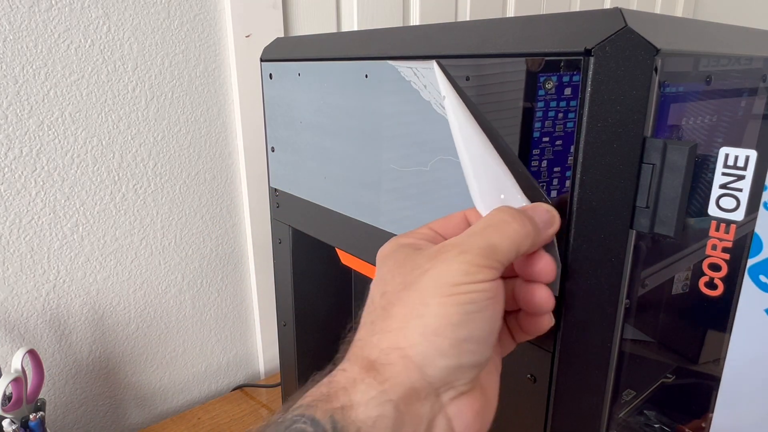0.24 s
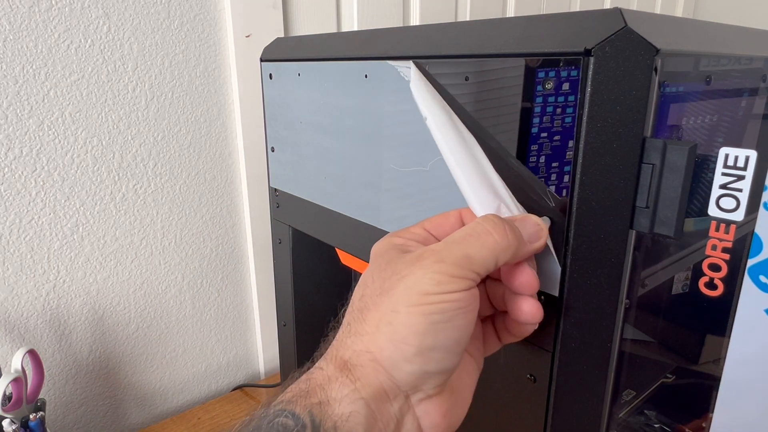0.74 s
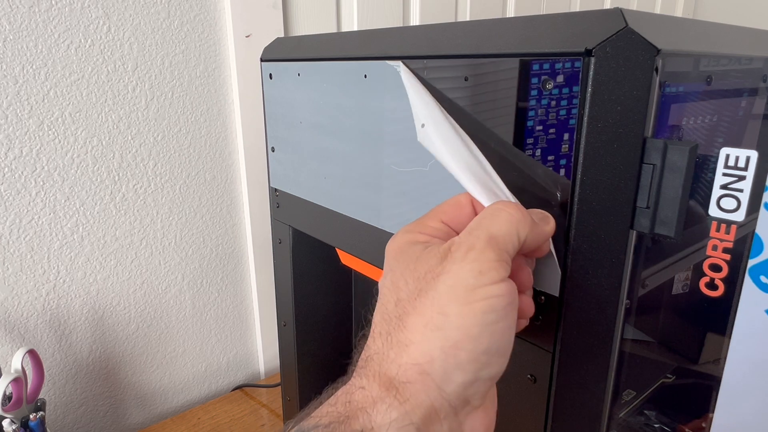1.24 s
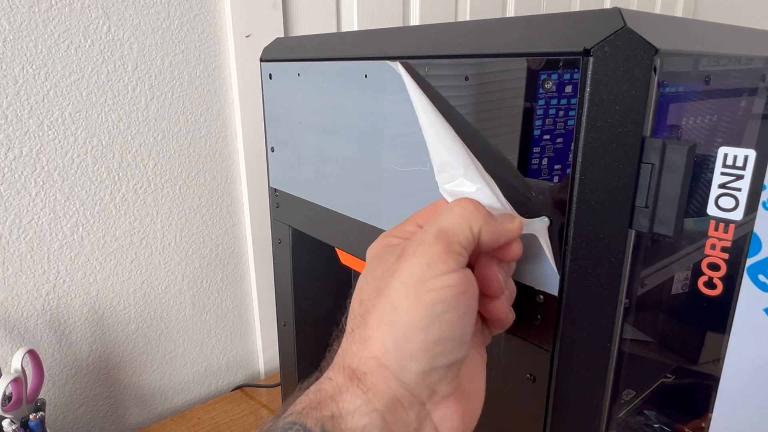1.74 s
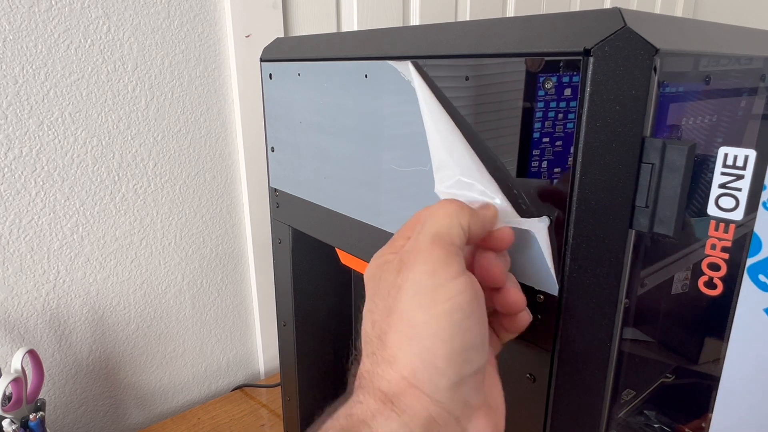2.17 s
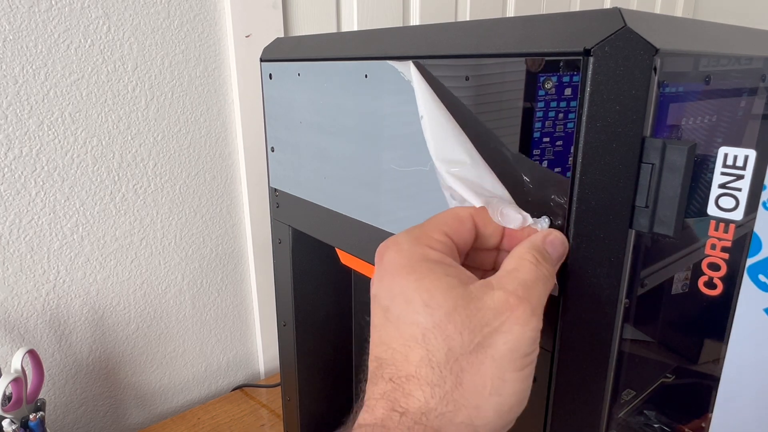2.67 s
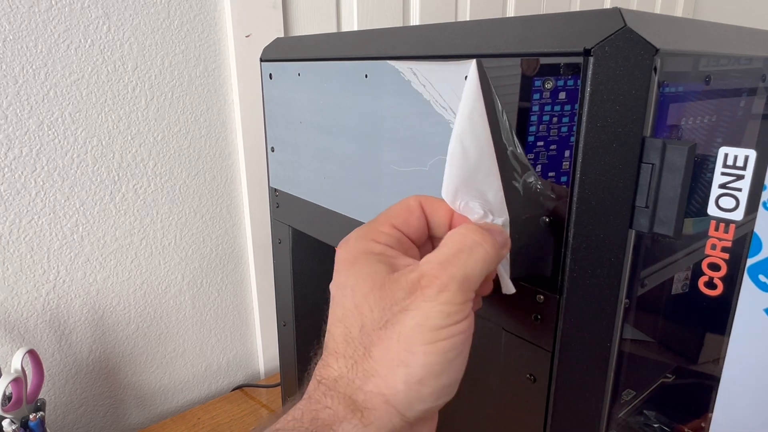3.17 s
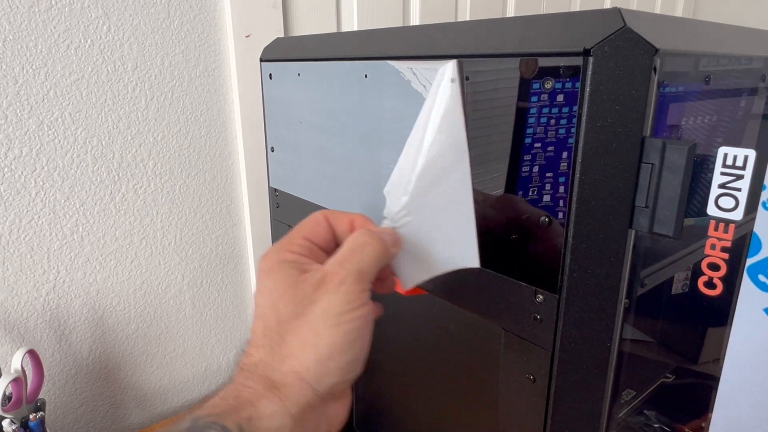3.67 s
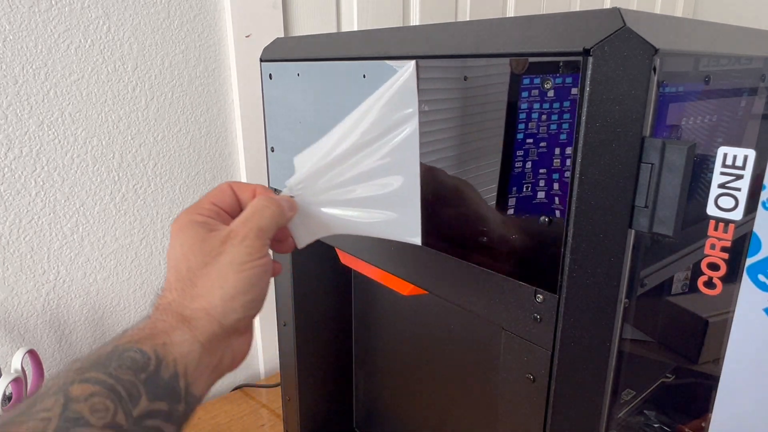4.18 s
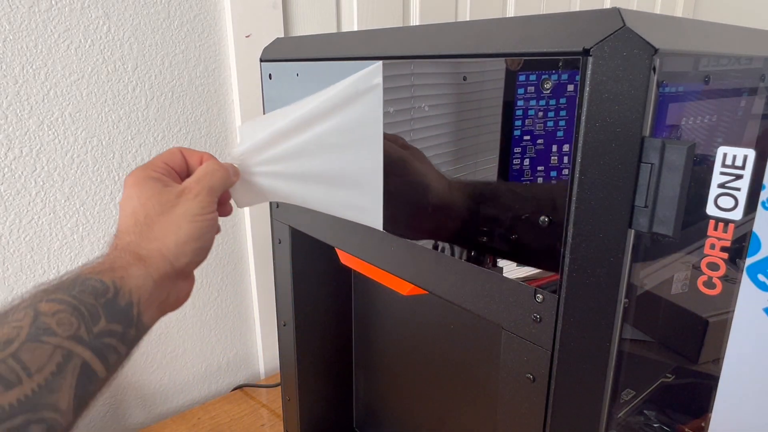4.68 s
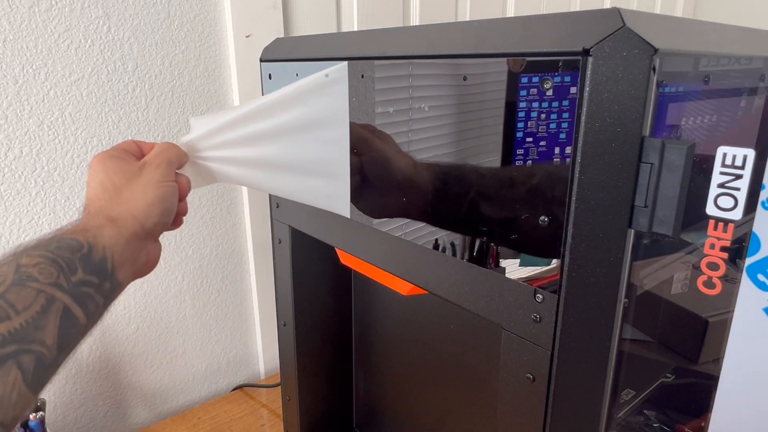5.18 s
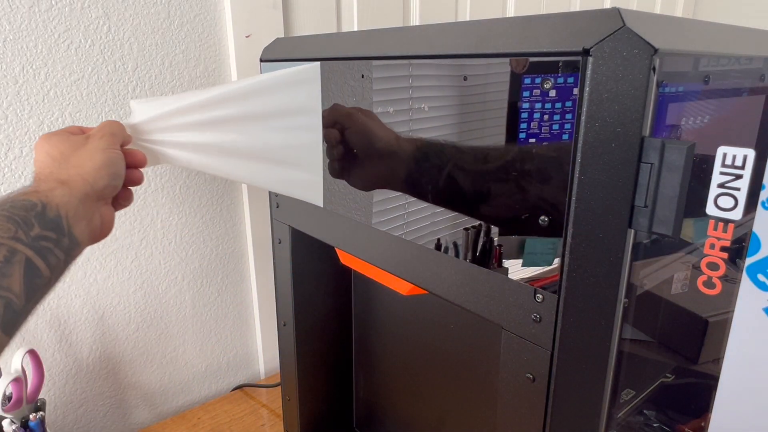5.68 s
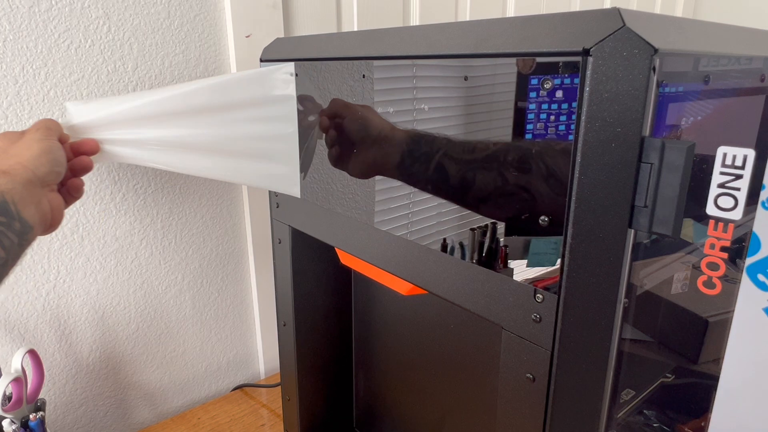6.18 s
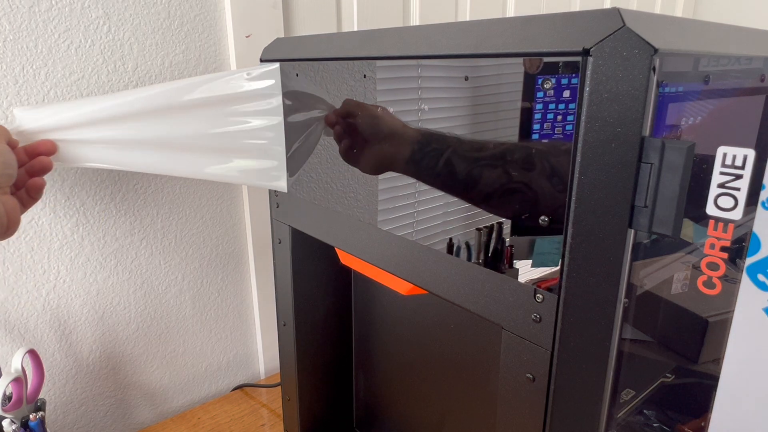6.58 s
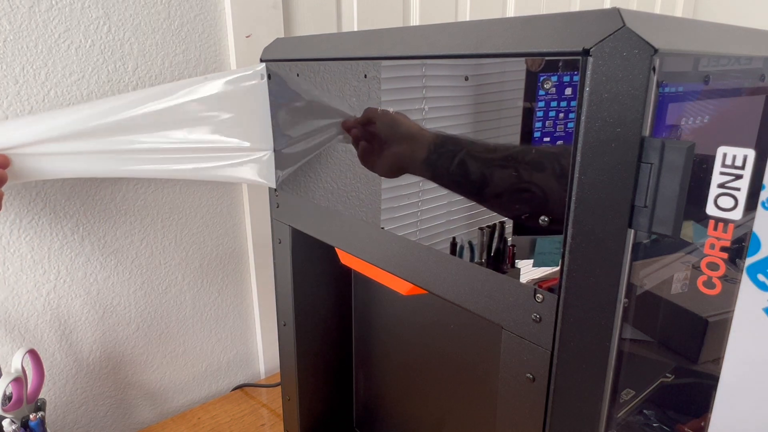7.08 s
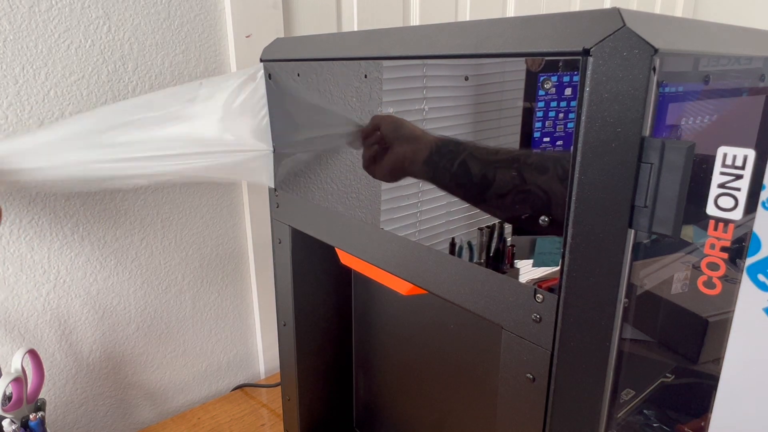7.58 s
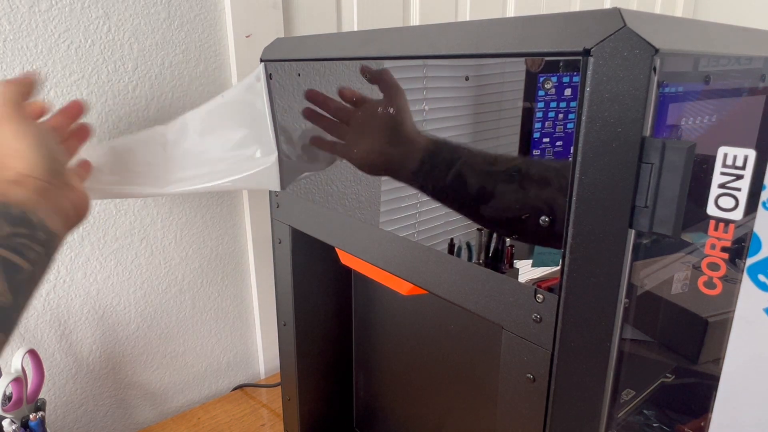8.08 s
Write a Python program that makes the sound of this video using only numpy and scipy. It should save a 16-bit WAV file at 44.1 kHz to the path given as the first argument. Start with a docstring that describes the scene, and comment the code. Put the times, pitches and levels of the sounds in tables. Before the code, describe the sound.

Close, in a small room with a faint low hum, fingers crinkle loose plastic film with dry snaps and quiet gaps. A loud hollow pop and brief high squeak come near three seconds. The film then peels in rapid jerky rips that blend into a thinning fine sizzle, until it releases with a crack and dull panel knock, then flaps and rustles.

```python
"""Protective film is pulled by hand off the front panel of a machine in a small room, over a low mains hum.
The slack film crinkles and snaps as its corner is worked loose (noise bursts), and folds pop (decaying modes).
Fingers tug the panel and squeak on the film (resonant noise), which then peels in slips that merge into
a fine sizzle (dense random clicks). At last the film lets go with a crack that sets the panel ringing,
and it flaps and rustles slack."""
import sys
import numpy as np
from scipy import signal
from scipy.fft import rfft, irfft
from scipy.io import wavfile
from scipy.ndimage import uniform_filter1d, map_coordinates

SR = 44100
rng = np.random.default_rng(int(sys.argv[2]) if len(sys.argv) > 2 else 0)


def master(y):
    """Save y as 16-bit WAV."""
    cut = np.clip(np.atleast_2d(y).T, -1, 1)
    pcm = np.round(cut * 32767)  # scale
    wavfile.write(sys.argv[1], SR, pcm.astype(np.int16))


N = 367353
TIME = np.arange(N) / SR


def from_db(db):
    """Level to amplitude: 20 dB is a factor of ten."""
    return 10 ** (np.asarray(db) / 20)


def rms_one(x):
    """Power normalisation: unit rms."""
    return x / np.sqrt(np.mean(x ** 2) + 1e-20)


def peak_one(x):
    """Short-time power normalisation: the loudest 4 ms get unit rms."""
    return x / np.sqrt(uniform_filter1d(np.mean(x ** 2, axis=0), size=176).max())


def in_time(rows):
    """Linear interpolation: each column of a curve at every sample."""
    s, *columns = np.transpose(rows)
    return [np.interp(TIME, s, column) for column in columns]


def between(start_s, end_s):
    """Gating: one between two times, with soft ends."""
    inside = (TIME >= start_s) & (TIME <= end_s)
    return uniform_filter1d(1. * inside, size=900)


def during(rows):
    """Gating: one while a curve lasts."""
    return between(rows[0][0], rows[-1][0])


def at_hz(points, hz):
    """Interpolation on a logarithmic frequency axis."""
    f, value = np.transpose(points)
    return np.interp(np.log(np.maximum(hz, 1)), np.log(f), value)


def band(x, low_hz, high_hz):
    """Band limitation by a causal Butterworth filter."""
    edges = [low_hz, min(high_hz, .45 * SR)]
    return signal.sosfilt(signal.butter(2, edges, "band", fs=SR, output="sos"), x)


def coloured(x, spectrum, size=4096):
    """Minimum-phase filtering: the spectrum's cepstrum, made causal, gives a response of unit energy."""
    cepstrum = irfft(np.log(from_db(at_hz(spectrum, np.fft.rfftfreq(size, 1 / SR)))))
    response = irfft(np.exp(rfft(2 * cepstrum[:size // 2], size)))
    response = response / np.linalg.norm(response)
    return signal.oaconvolve(x, response[None], axes=-1)[:, :x.shape[-1]]


def varied(colour, count=22):
    """Individual resonance: each patch of film gets chance peaks and valleys, with a spread of 3 dB."""
    hz = np.geomspace(colour[0][0], colour[-1][0], count)
    return list(zip(hz, at_hz(colour, hz) + 3 * rng.standard_normal(count)))


def drift(rate):
    """Random fluctuation: chance values, rate per second, joined by lines; rms 1."""
    knots = rng.standard_normal(int(TIME[-1] * rate) + 2)
    return rms_one(np.interp(TIME * rate, np.arange(len(knots)), knots))


def pair(alike, size=N):
    """Interchannel coherence: left and right white noise with a given correlation."""
    mid, side = rng.standard_normal((2, size))
    alike = np.clip(alike, 0, 1)
    return (np.sqrt(1 + alike) * mid + np.sqrt(1 - alike) * side * [[1], [-1]]) / np.sqrt(2)


def grains(per_s, spread_db, clump_db, alike):
    """Impulsive noise: random clicks of uneven size whose strength swells in clumps; rms 1."""
    sizes_db = spread_db * np.minimum(rng.exponential(1, N), 5.5)
    sizes = from_db(sizes_db + clump_db * drift(180))
    return rms_one(pair(alike) * sizes * (rng.random(N) < per_s / SR))


def narrow_noise(hz, width_hz):
    """Quadrature modulation: noise in one moving resonance; rms 1."""
    phase = 2 * np.pi * np.cumsum(hz) / SR
    return rms_one(drift(width_hz) * np.cos(phase) + drift(width_hz) * np.sin(phase))


def struck(s, modes):
    """Modal superposition: decaying modes, set off together with alternating signs."""
    t = np.maximum(TIME - s, 0)
    ring = np.zeros(N)
    for k, (hz, db, t60) in enumerate(modes):
        decay = from_db(np.maximum(db - 60 * t / t60, -200))
        ring += (-1) ** k * decay * np.sin(2 * np.pi * hz * t)
    return ring


def avalanche(envelope, alike):
    """Shot noise with a flat spectrum: tiny ruptures under an envelope."""
    swell, size = np.sqrt(envelope), len(envelope)
    ruptures = pair(alike, size=size) * from_db(4.6 * np.minimum(rng.standard_normal(size), 2))
    whitened = irfft(np.exp(1j * np.angle(rfft(ruptures * swell))))
    return swell * whitened


def burst(t60, rise_s, alike, spike_db=-12, size=4096):
    """Brittle fracture: one sharp step amid an avalanche that rises and decays exponentially."""
    t = TIME[:size]
    envelope = (1 - np.exp(-t / rise_s)) * from_db(-60 * t / max(t60, .002))
    fracture = np.diff(signal.unit_impulse(size, np.argmax(envelope) // 2), prepend=0)
    return avalanche(envelope, alike) + from_db(spike_db) * fracture


def add(out, s, sound):
    """Superposition: mix a sound in at a time."""
    i = max(round(s * SR), 0)
    out[:, i:i + sound.shape[-1]] += sound[:, :max(N - i, 0)]


# mains hum and the tones of a fan: (frequency [Hz], level [dB], wavering [dB])
HUM_TONES = [(59.97, -57.5, 1.4), (56.2, -69.5, 0.5), (118, -73, 4), (151, -78, 3.5)]
# soft rush of air: (frequency [Hz], relative density [dB])
AIR_COLOUR = [(25, -0.5), (55, 5), (100, 4.5), (200, -11), (450, -24.5), (1100, -38.5), (1700, -11),
              (2500, -40.5), (3400, -26.5), (4300, -43), (6000, -24.5), (9000, -39.5), (15000, -41.5)]


def background():
    """Beating of neighbouring tones: mains hum with an idling fan, over its soft rush."""
    hum = np.zeros(N)
    for hz, db, waver_db in HUM_TONES:
        hum += from_db(db + waver_db * drift(6.3)) * np.sqrt(2) * np.sin(2 * np.pi * hz * TIME)
    return hum + from_db(-62.5) * coloured(pair(0.79), AIR_COLOUR)


def grip(s, length_s):
    """Exponential envelope: attack, hold and release of one movement of the fingers."""
    attack_s, release_s = 0.018, 0.048
    outside = np.maximum((s - TIME) / attack_s, (TIME - s - length_s) / release_s)
    return np.exp(-np.clip(outside, 0, 20))


PEEL_START_S, PEEL_END_S = 3.48, 7.2
# fingers take a new hold of the loose film:
# (time [s], length [s], crinkle level [dB], rubbing level [dB])
GRIPS = [(0, 0.083, -63.5, -76), (0.273, 0.13, -54, -62), (0.665, 0.12, -63.5, -65.5),
         (0.966, 0.39, -59, -61), (1.633, 0.46, -77, -59), (2.167, 0.036, -48.5, -51.5),
         (2.805, 0.02, -50.5, -63.5), (2.934, 0.19, -59, -54), (3.191, 0.38, -70.5, -63),
         (7.546, 0.37, -49.5, -55), (8.046, 0.23, -48, -57)]
# skin on film: (frequency [Hz], relative density [dB])
RUBBING_COLOUR = [(100, -2), (240, 4.5), (300, 0.5), (600, -5), (1150, -8.5), (1600, -1.5), (2600, -11),
                  (6000, -19)]
# flipping creases and bright ticks: (frequency [Hz], relative density [dB])
TICK_COLOUR = [(400, -22), (1200, -8.5), (2500, -5), (6000, -8), (9000, -1), (15000, -7.5)]


def handling():
    """Buckling and friction: the slack film crinkles, and skin rubbing on it stirs the panel's main mode."""
    flips = grains(per_s=900, spread_db=2, clump_db=4, alike=.3)
    crinkle = coloured(flips, [(800, -9.5), (2500, -6.0), (5500, -6), (9000, -2.5), (15000, -11.5)])
    stray_creases = grains(per_s=17, spread_db=8.5, clump_db=2.0, alike=0.22)
    crinkle = crinkle + from_db(-11) * coloured(stray_creases, TICK_COLOUR)
    rubbing = coloured(grains(per_s=6500, spread_db=3.0, clump_db=2.0, alike=0.55), RUBBING_COLOUR)
    panel = narrow_noise(np.full(N, 250), width_hz=14)
    # between grips the slack film is just held
    slack = 1 - between(PEEL_START_S, PEEL_END_S)
    crinkle_gain, rubbing_gain = slack * from_db(-74), slack * from_db(-72.5)
    for s, length_s, crinkle_db, rubbing_db in GRIPS:
        press = grip(s, length_s)
        crinkle_gain = np.maximum(crinkle_gain, from_db(crinkle_db) * press)
        rubbing_gain = np.maximum(rubbing_gain, from_db(rubbing_db) * press)
    return crinkle_gain * crinkle + rubbing_gain * (rms_one(rubbing) + from_db(-7) * panel)


def clicks(events, colour, t60):
    """Impulsive excitation: one short burst for each row, each with a colour of its own."""
    out = np.zeros((2, N))
    for s, db in events:
        click = coloured(burst(t60, rise_s=0.00053, alike=0.37), varied(colour))
        add(out, s, from_db(db) * peak_one(click))
    return out


# a small crease flips: (time [s], level [dB])
TICKS = [(0.2665, -34), (0.29, -26.5), (0.308, -26.5), (0.315, -32), (1.2255, -32), (1.3145, -30),
         (1.843, -41), (2.676, -48.5), (3.407, -44), (4.2545, -40), (4.3217, -41), (4.4044, -46),
         (4.597, -43), (4.7786, -45.5), (4.9258, -37), (5.9363, -41.5), (6.164, -38), (7.901, -38.5),
         (8.0699, -37), (8.103, -31), (8.231, -37.5)]


def ticks():
    """Snap-through: each small crease releases its strain in one click."""
    return clicks(TICKS, TICK_COLOUR, t60=0.026)


# a wide patch of film: (frequency [Hz], relative density [dB])
THUD_COLOUR = [(40, -21.0), (230, 2), (450, 4), (660, -5), (1100, 1), (2500, -25.5)]


def thud():
    """Radiation from a large area: the low knock of a wide patch of film jumping."""
    return peak_one(coloured(burst(t60=.035, rise_s=0.00088, alike=0.8), THUD_COLOUR))


# the film buckles or a patch of glue lets go:
# (time [s], treble level [dB], body: bass minus treble [dB], length [s])
SNAPS = [(0.2754, -30, -19, 0.0014), (0.3412, -17.5, -18, 0.0018), (1.048, -38, -15, 0.0033),
         (1.104, -29, -28.5, 0.0021), (1.183, -18.5, -15, 0.0002), (1.2593, -21, -11, 0.0044),
         (1.273, -26, -11.5, 0.0037), (1.972, -22.5, -57, 0.0017), (2.9876, -20, -10, 0.0041),
         (3.258, -40, -11.5, 0.0034), (4.9633, -27.5, -23.5, 0.0036), (6.921, -23, -25.5, 0.00182),
         (7.572, -22, 3, 0.00427), (7.576, -25, -4, 0.0092), (7.5941, -26, -3.5, 0.0062),
         (7.762, -32, -13, 0.0059), (7.823, -31, -35, 0.0019)]
# treble of a snap: (frequency [Hz], relative density [dB])
SNAP_COLOUR = [(1500, -29), (3100, -3), (5600, 3), (9000, 1.5), (15000, -5)]
SNAP_ATTACK_S, SNAP_RELEASE_S = 0.00017, 0.00087
SHIVER_DB, SHIVER_T60 = -12.5, 0.03   # the film shivers on after a snap
MIDDLE_SHARE = 0.71   # the middle's level in dB follows the body by this share


def snaps(size=4096):
    """Crack propagation: a crack gathers, runs and stops; a larger patch radiates more middle and bass."""
    out, lead_s = np.zeros((2, N)), .004
    t = TIME[:size] - lead_s
    for s, db, body_db, length_s in SNAPS:
        outside = np.maximum(-t / SNAP_ATTACK_S, (t - length_s) / SNAP_RELEASE_S)
        run = np.exp(-np.clip(outside, 0, 20))
        shiver = (t > 0) * from_db(SHIVER_DB - 60 * np.abs(t) / SHIVER_T60)
        treble = coloured(avalanche(np.maximum(run, shiver), alike=0.3), varied(SNAP_COLOUR))
        middle = band(burst(t60=0.025, rise_s=0.0011, alike=0.81), 1400, 3600)
        body = from_db(MIDDLE_SHARE * body_db) * peak_one(middle) + from_db(body_db) * thud()
        add(out, s - lead_s, from_db(db) * peak_one(treble))
        add(out, s - .0007, from_db(db) * body)
    return out


# a fold pops through: (time [s], level [dB], pitch ratio [1]: smaller folds ring higher)
POPS = [(0.3412, -10.5, 1.12), (2.648, -39.5, 1.27), (2.785, -31.5, 1.27), (2.988, 1, 0.97),
        (2.9917, -5, 0.98), (3.3254, -32.5, 1.418)]
# modes of the fold; the last, faint and long, is the room ringing on after the pop:
# (frequency at ratio 1 [Hz], level relative to the pop [dB], T60 [s])
POP_MODES = [(814, -15, 0.012), (1410, -11, 0.018), (1730, -16.5, 0.011), (1378, -42, 0.32)]


def pops():
    """Snap-through and free vibration: a fold flips over and rings for a moment, and the room rings on."""
    out = np.zeros(N)
    for s, db, ratio in POPS:
        modes = [(hz * ratio, level_db, t60) for hz, level_db, t60 in POP_MODES]
        out += from_db(db) * struck(s, modes)
    return out


# the peel line jerks forward, at first in long strong steps: (time [s], level [dB])
JERKS = [(0.3425, -17), (3.4853, -27.5), (3.5294, -26.5), (3.566, -39), (3.5896, -27), (3.6379, -28.5),
         (3.663, -28.5), (3.681, -34), (3.717, -27.5), (3.7477, -29.5), (3.7687, -28), (3.7935, -29.5),
         (3.8325, -37), (3.851, -31), (3.898, -32.5), (3.9393, -32.5), (3.9612, -33.5), (3.9916, -33),
         (4.094, -37), (4.1223, -36), (4.1628, -41.5)]
# slips and tiny rips: (frequency [Hz], relative density [dB])
SLIP_COLOUR = [(90, -18), (250, -10), (700, -11), (1200, 0), (1700, 2.5), (2900, 8), (6000, 0), (9000, -2),
               (15000, -9.5)]


def jerks():
    """Stick-slip: each forward jerk of the peel line gives a short burst."""
    return clicks(JERKS, SLIP_COLOUR, t60=0.01415)


# the film tugs at the panel or lets it spring back: (time [s], level [dB])
TUGS = [(1.655, -26), (1.692, -30), (2.451, -34.5), (7.576, -1.5)]
# modes of the panel: (frequency [Hz], level relative to the tug [dB], T60 [s])
PANEL_MODES = [(69.8, -22.5, 0.125), (184, -20.5, 0.14), (241, -20.5, 0.31), (252.5, -23.5, .28),
               (408, -28, 0.163), (1107, -39, 0.114)]


def tugs():
    """Modal excitation: each tug knocks on the panel and sets it ringing."""
    out = np.zeros((2, N))
    for s, db in TUGS:
        add(out, s, from_db(db - 25) * thud())
        out += from_db(db) * struck(s, PANEL_MODES)
    return out


# a strip of glue tears in a crescendo: (time of the top [s], level [dB], rise [s], fall [s])
RIPS = [(2.184, -40.5, 0.0099, 0.023), (4.971, -33.5, 0.023, 0.025), (6.167, -32, 0.0096, 0.022),
        (6.94, -31.5, 0.0037, 0.016), (7.048, -34, 0.021, 0.023)]
# tearing glue: (frequency [Hz], relative density [dB])
RIP_COLOUR = [(250, 3), (700, -15), (2600, -3.5), (3600, 0.5), (5600, 4.5), (9000, 3), (15000, -8.5)]


def rips():
    """Cascading failure: each broken thread loads the next, so the tearing swells before it runs out."""
    swell = np.zeros(N)
    for s, db, rise_s, fall_s in RIPS:
        distance = np.maximum((s - TIME) / rise_s, (TIME - s) / fall_s)
        swell += from_db(db) * np.exp(-np.minimum(distance, 20))
    return swell * coloured(grains(per_s=6000, spread_db=-0.5, clump_db=2.0, alike=0.33), RIP_COLOUR)


# film skids under the fingertip: (time [s], frequency [Hz], level [dB])
SQUEAK = [(2.95, 6040, -69.5), (2.957, 6400, -39), (3.005, 5850, -41.5), (3.035, 6100, -44.5),
          (3.056, 6800, -35), (3.095, 6410, -47)]


def squeak():
    """Stick-slip oscillation: a wavering chirp and its octave, chopped by a fluttering fold that also buzzes."""
    hz, db = in_time(SQUEAK)
    hz = hz * (1 + 0.025 * drift(110))
    overtone = from_db(-7.0) * narrow_noise(2 * hz, width_hz=2400)
    chirp = narrow_noise(hz, width_hz=640) + overtone
    flutter = narrow_noise(np.full(N, 1350), width_hz=220)
    buzz = from_db(-11) * flutter * during(SQUEAK[2:])   # joins after the onset
    return from_db(db) * (chirp * (1 + 0.528 * flutter) + buzz) * during(SQUEAK)


def drumming(hz):
    """Sustained resonance: one gliding mode, shaken so densely that it hardly fades; rms 1."""
    width_hz, evenness = 260, 0.76   # the steady pull evens out the fading (0-1)
    shake = drift(width_hz) + 1j * drift(width_hz)
    shake = shake / (np.abs(shake) + 1e-9) ** evenness
    return rms_one(np.real(shake * np.exp(2j * np.pi * np.cumsum(hz) / SR)))


# vigour of the peeling, the reference for its layers: (time [s], level [dB])
PEEL_VIGOUR = [(3.6, -46.5), (3.84, -45.5), (4.46, -55), (4.78, -57.5), (4.96, -51), (5.13, -57.5),
               (6.0, -55.5), (6.12, -53.5), (6.52, -60), (7.02, -63.5), (7.2, -76)]
# fine breaking threads: (frequency [Hz], relative density [dB])
SIZZLE_COLOUR = [(1000, -45), (2700, -8), (4000, -0.5), (5600, 1), (9000, -2), (15000, -4.5)]
# coarse breaking threads: (frequency [Hz], relative density [dB])
CRACKLE_COLOUR = [(250, 6.5), (700, -5.5), (1100, -2), (1600, 3), (2900, -8), (5000, -10), (12000, -9)]
# pitch of the taut film, falling as the free length grows, then higher under tension:
# (time [s], frequency [Hz])
DRUM_PITCH = [(3.52, 376.4), (3.61, 285.1), (3.8, 220), (4.2, 194.9), (4.9, 255), (6.8, 220)]
# levels against the vigour
SIZZLE_DB, JERKY_LOSS_DB, SETTLE_S = 2, 6, 0.48   # the sizzle grows as the pull settles
COARSE_UNTIL_S, COARSE_DB, SMOOTH_DB = 5.14, -8, -17.5   # crackle, before and after the peel runs smooth
TEAR_DB, TEAR_UNTIL_S, TEAR_FADE_DB_PER_S = -1.5, 3.6, 14   # tiny rips fade as the pull settles
DRUM_DB, JERKY_DRUM_DB = -11.5, 7   # the film's drumming, and what the jerks add


def peeling():
    """Fracture noise: threads of glue break by the thousand, tiny rips fill the gaps, the taut film drums."""
    vigour_db, = in_time(PEEL_VIGOUR)
    jerky = np.clip(1 - (TIME - PEEL_START_S) / SETTLE_S, 0, 1)
    coarse_part = between(0, COARSE_UNTIL_S)
    surge_db = 1.3 * drift(45) * coarse_part   # the glue holds unevenly

    sizzle_db = vigour_db + SIZZLE_DB - JERKY_LOSS_DB * jerky
    fine = grains(per_s=8600, spread_db=-3.0, clump_db=1.5, alike=0.25)
    sizzle = from_db(sizzle_db + surge_db) * coloured(fine, SIZZLE_COLOUR)

    crackle_db = vigour_db + SMOOTH_DB + (COARSE_DB - SMOOTH_DB) * coarse_part
    coarse = grains(per_s=1100, spread_db=2, clump_db=2, alike=.6)
    crackle = from_db(crackle_db) * coloured(coarse, CRACKLE_COLOUR)

    # coarser tearing brings more bright ticks
    sparse = grains(per_s=110, spread_db=2.5, clump_db=3, alike=.7)
    bright_ticks = from_db(0.73 * sizzle_db + 0.36 * crackle_db + 3.5) * coloured(sparse, TICK_COLOUR)

    tear_db = vigour_db + TEAR_DB - TEAR_FADE_DB_PER_S * np.maximum(TIME - TEAR_UNTIL_S, 0)
    tiny_rips = grains(per_s=260, spread_db=2.3, clump_db=2.5, alike=.55)
    tearing = from_db(tear_db + surge_db) * coloured(tiny_rips, SLIP_COLOUR)

    drum_hz, = in_time(DRUM_PITCH)
    drum_db = vigour_db + DRUM_DB + JERKY_DRUM_DB * between(0, TEAR_UNTIL_S)
    drum = from_db(drum_db) * drumming(drum_hz)
    return between(PEEL_START_S, PEEL_END_S) * (sizzle + bright_ticks + crackle + tearing + drum)


# the last coarse threads of glue part: (time [s], level [dB])
THREADS = [(5.096, -44.5), (5.124, -46)]


def threads():
    """Tensile failure: each coarse thread parts in one crackling burst."""
    return clicks(THREADS, CRACKLE_COLOUR, t60=0.02133)


def flapping():
    """Damped motion: the freed film beats on the panel in a low, broken rattle that dies away."""
    start_s, level_db, t60 = 7.595, -32.5, 0.19
    dying = from_db(level_db - 60 * np.abs(TIME - start_s) / t60) * between(start_s, TIME[-1])
    beats = grains(per_s=2000, spread_db=.5, clump_db=2, alike=.5)
    return dying * coloured(beats, THUD_COLOUR)


# position and turning of the film:
# (time [s], left minus right [dB], left lead [ms], top-octave level [dB])
PLACE = [(0, 3, 0.023, 1), (2, 1.5, 0.037, 2), (3, 0.5, 0.044, 0.5), (4.3, 3.5, 0.1628, 3),
         (6.3, 3.5, 0.23, -4), (8.33, 2.5, 0.17, 1.5)]


def placed(x):
    """Stereo localisation: the nearer side is louder and sooner; the top changes as the film turns."""
    pan_db, lead_ms, top_db = in_time(PLACE)
    x = x + (from_db(top_db) - 1) * band(x.mean(axis=0), 8400, 17000)
    right = map_coordinates(x[1], [np.arange(N) - lead_ms * SR / 1000], order=3)
    return np.array([x[0] * from_db(pan_db / 2), right * from_db(-pan_db / 2)])


# decay of the room: (frequency [Hz], T60 [s])
ROOM_T60 = [(100, 0.81), (260, 0.32), (700, 0.34), (1500, 0.25), (5000, 0.35), (13000, 0.19)]


def room(x, wet_db, build_s, size=30000):
    """Diffuse reverberation: reflections build up quickly and die band by band."""
    t, white, tail = TIME[:size], pair(0.12, size=2 * size), 0
    edges = np.geomspace(60, 18000, 10)
    for k, (low, high) in enumerate(zip(edges, edges[1:])):
        decay = from_db(-60 * t / at_hz(ROOM_T60, np.sqrt(low * high)))
        tail = tail + band(white[:, k % 2::2], low, high) * decay   # neighbouring bands use separate noise
    tail = band(tail, edges[0], 10000)   # the walls return little above this
    tail = tail * (1 - np.exp(-(t / build_s) ** 2))
    tail = tail / np.linalg.norm(tail, axis=1, keepdims=True)
    return from_db(wet_db) * signal.oaconvolve(x, tail, axes=-1)[:, :N]


def scene():
    """Superposition: the film sounds in the room, over the panel's ring and the background."""
    sharp = ticks() + snaps() + pops() + jerks() + threads()
    film = placed(handling() + sharp + rips() + squeak() + peeling() + flapping())
    return background() + film + room(film, wet_db=-7.5, build_s=.0014) + tugs()


# dips in the treble: (frequency [Hz], width [Hz], level [dB])
TREBLE_DIPS = [(7590, 520, -15.5), (10700, 3100, -14)]


def record(dry):
    """Tone shaping: two dips darken the treble; the deep bass and the top are cut."""
    for hz, width_hz, db in TREBLE_DIPS:
        peak = signal.lfilter(*signal.iirpeak(hz, hz / width_hz, fs=SR), dry)
        dry = dry + (from_db(db) - 1) * peak
    dry = signal.sosfilt(signal.butter(3, 46, "high", fs=SR, output="sos"), dry)
    return signal.sosfilt(signal.ellip(10, .3, 80, 16100, fs=SR, output="sos"), dry)


dry = scene()
out = record(dry)
master(out)
```